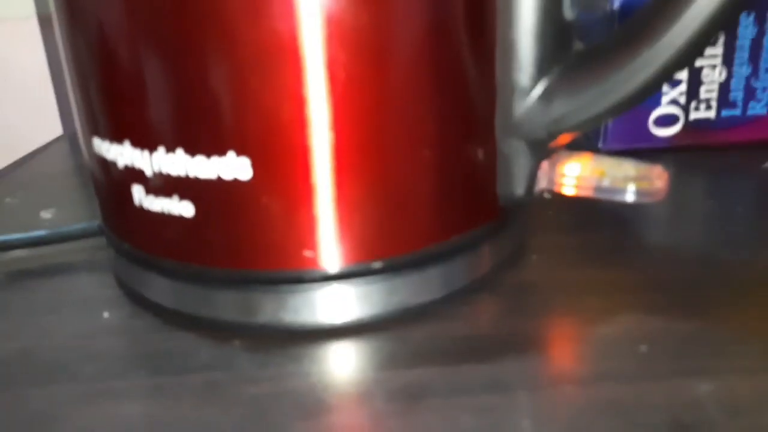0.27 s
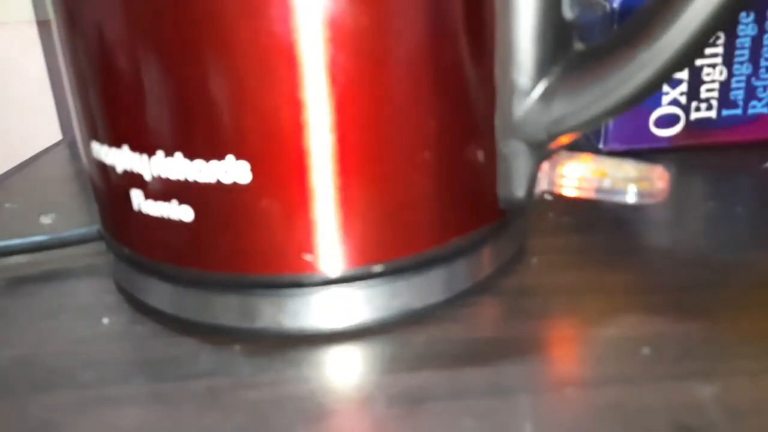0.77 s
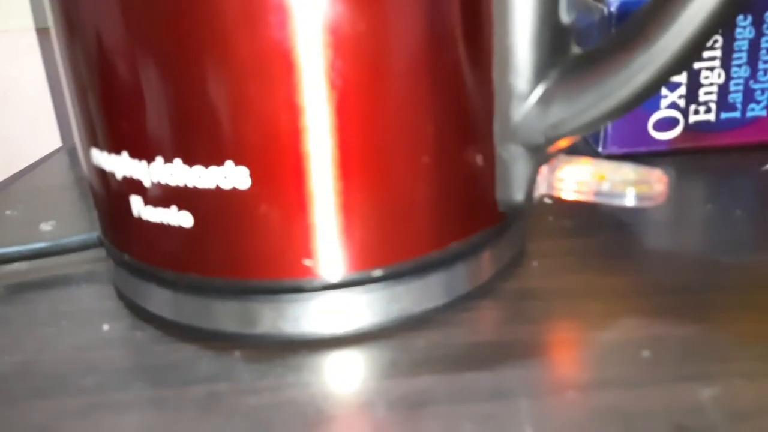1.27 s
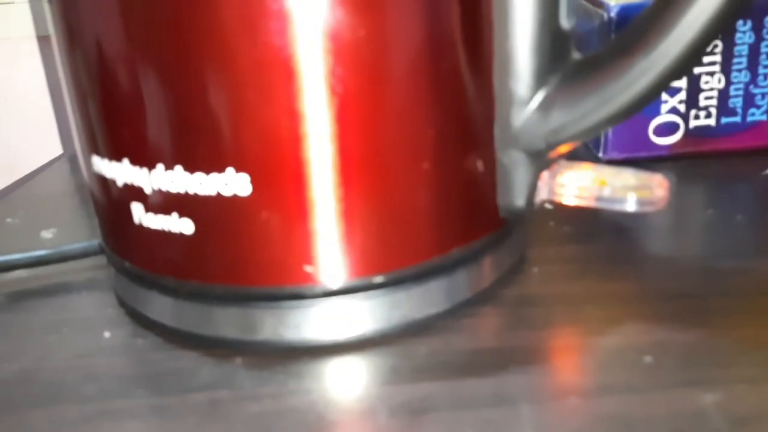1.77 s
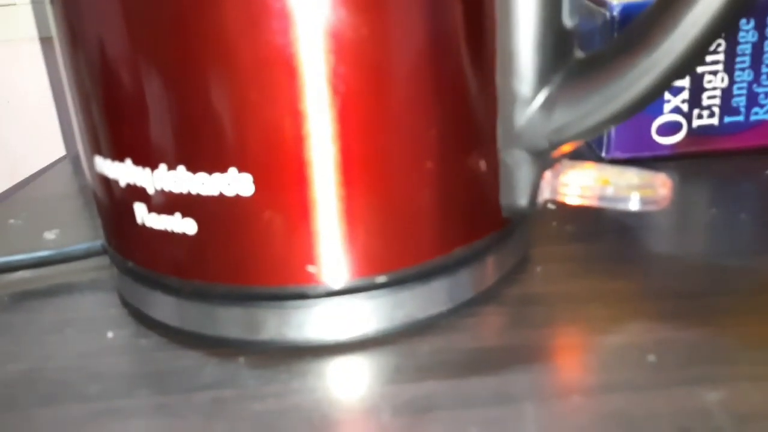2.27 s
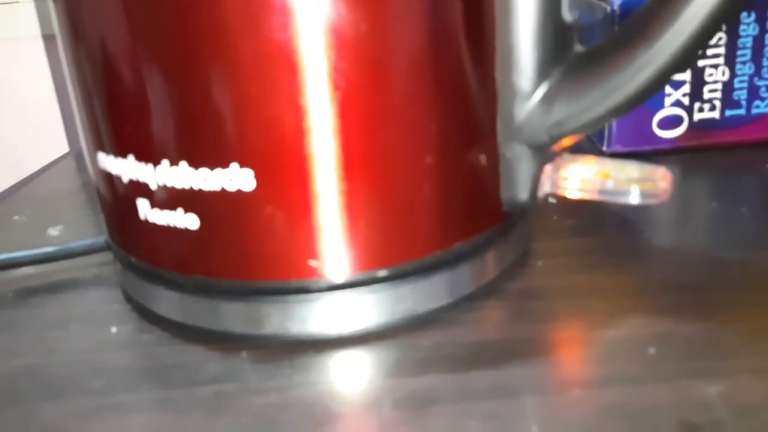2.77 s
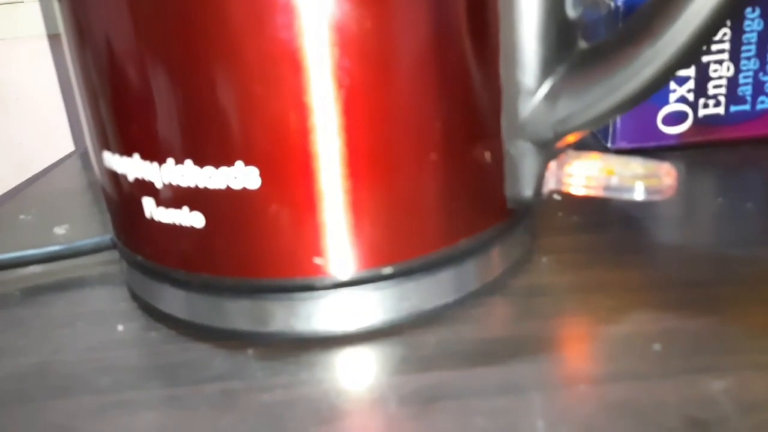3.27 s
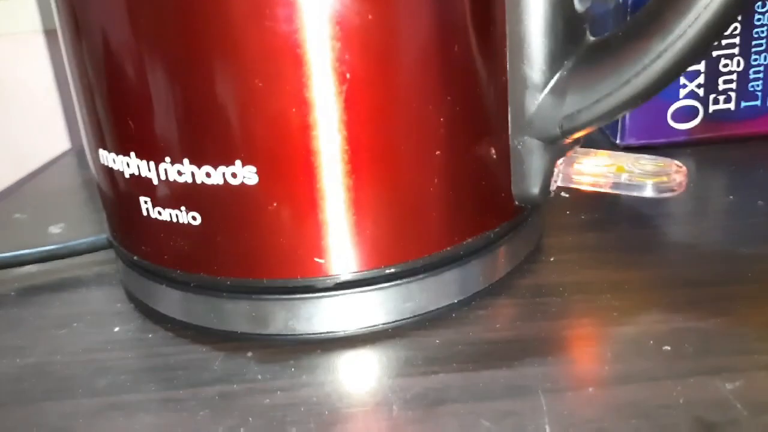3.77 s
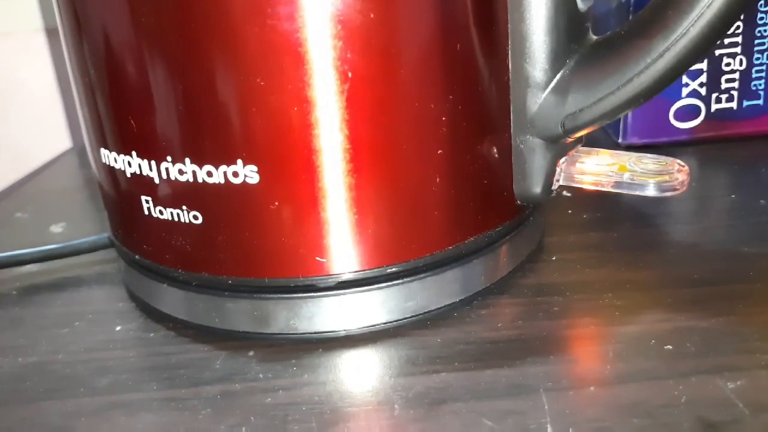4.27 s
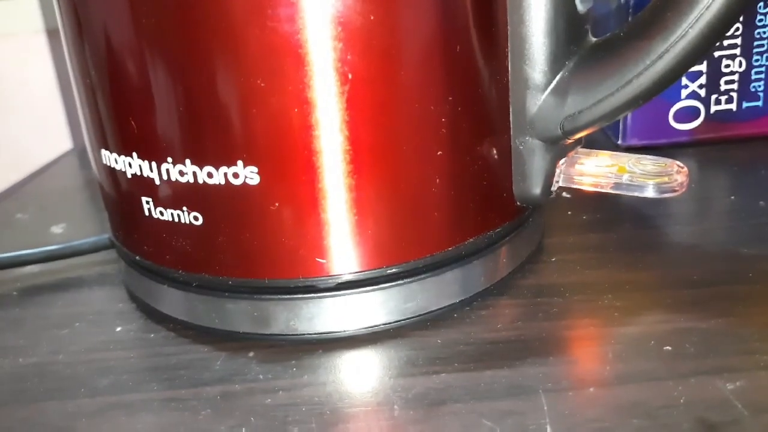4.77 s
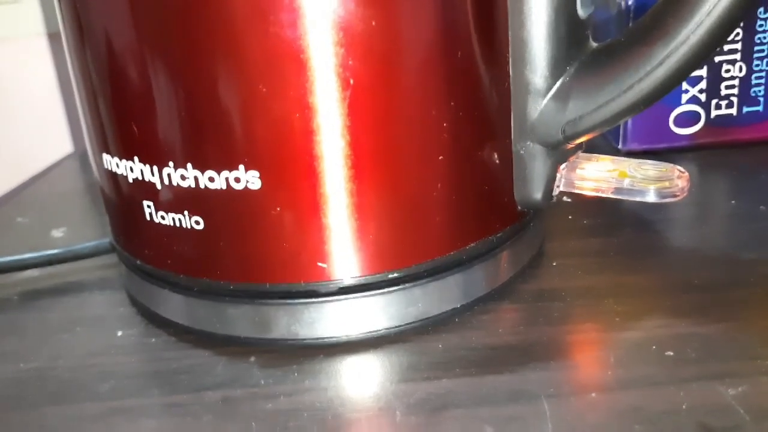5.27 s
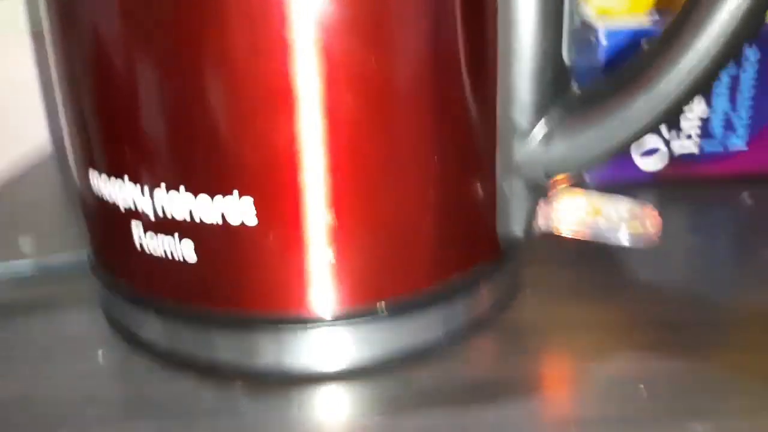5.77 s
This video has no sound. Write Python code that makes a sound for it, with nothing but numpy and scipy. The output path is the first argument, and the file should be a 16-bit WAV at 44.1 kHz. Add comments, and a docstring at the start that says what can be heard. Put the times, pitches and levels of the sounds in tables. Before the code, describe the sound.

Close up, an electric kettle heats: a low hollow rumble with soft hiss swells for over a second, then holds steady with bubbly knocks.

```python
"""Electric kettle heating up

Heard close by on a kitchen counter, through a hand-held microphone.
Steam bubbles grow on the hot plate and collapse in cooler water: large ones rumble, countless small
ones hiss, as random impulses through the resonances of the hollow body. The rush swells for over a
second, then roughly holds. Crackle, plinks and the short low lumps that stand out of the rumble are
decaying sines. Faint ticks, low bumps and a little room reverberation complete it."""
import sys
import numpy as np
from scipy import signal
from scipy.fft import rfft, irfft
from scipy.io import wavfile

SR = 44100
rng = np.random.default_rng(int(sys.argv[2]) if len(sys.argv) > 2 else 0)


def master(y):
    """Save y as 16-bit WAV."""
    cut = np.clip(np.atleast_2d(y).T, -1, 1)
    pcm = np.round(cut * 32767)  # scale
    wavfile.write(sys.argv[1], SR, pcm.astype(np.int16))


N = 264996
EDGE_HZ = 15720
TAPS = 8192  # length in samples of a collapse or a decaying sine

# kitchen decay time: (frequency [Hz], t60 [s])
KITCHEN_T60 = [(150, 0.23), (1000, 0.94), (5000, 0.15), (14000, 0.63)]
# soft low bumps, as from the hand that holds the microphone: (time [s], peak [dB], frequency [Hz])
HAND_BUMPS = [(2.19, -45, 54), (5.60, -44, 58), (5.99, -38.5, 54.5)]
# faint dry ticks: (time [s], peak [dB])
DRY_TICKS = [(5.540, -50), (5.837, -46)]
# free bubbles that ring briefly: (time [s], peak [dB], frequency [Hz])
PLINK_BUBBLES = [(0.923, -63, 6550), (1.296, -42, 2810), (1.349, -44, 2320), (1.421, -42, 2060),
                 (1.471, -34, 1140), (2.050, -44, 2240), (2.108, -35, 990), (2.364, -43, 2830),
                 (2.952, -59, 6720), (5.807, -47, 2820)]
# short low knocks and lumps within the rumble: (time [s], peak [dB], frequency [Hz], swell [s])
RUMBLE_LUMPS = [(0.088, -40, 805, 0.0034), (0.258, -34.5, 494, .012), (0.506, -37.5, 517, 0.0068),
                (0.535, -35, 237, 0.015), (0.674, -28, 260, 0.0052), (1.243, -25.5, 262, 0.0067),
                (1.520, -23.5, 231, 0.021), (1.646, -26.5, 516, .004), (2.312, -25, 473, 0.0041),
                (2.727, -31.5, 475, .005), (4.634, -22.5, 488, 0.006), (5.054, -22, 480, 0.0055),
                (5.765, -18, 410, 0.0014), (5.814, -28, 690, .003), (5.940, -33, 566, 0.0039)]
# resonances of steel body, water and air above: (frequency [Hz], width [Hz], lift [dB])
BODY_MODES = [(103, 6, 1.5), (131.3, 13.3, 5), (199.8, 8.9, 5.5), (230.6, 16.6, 9), (250.3, 27, 8.5),
              (277.5, 13.4, 6), (398.4, 32, 3.5), (451, 15.5, 3.5), (480.6, 44, 6), (505, 11.6, 5),
              (533.5, 36, 3.5), (603, 23, 2.5), (808, 54, 4.5), (951, 64, 3.5), (1179, 98, 6.5),
              (1270, 67, 2.5), (1906, 150, 3), (2660, 650, 1), (4450, 870, 3), (5850, 760, 4)]
# colour of large collapses: (frequency [Hz], relative density [dB per Hz])
LARGE_COLOUR = [(20, -45), (35, -28), (54, -15.5), (80, -12), (115, -6.5), (165, -2), (330, -0.5),
                (560, 0.5), (700, -5), (900, -8.5), (1040, -22), (1600, -31.5), (4000, -53.5)]
# colour of small collapses: (frequency [Hz], relative density [dB per Hz])
SMALL_COLOUR = [(200, -33), (700, -1), (1100, 1), (1550, 0.34), (2300, -6.2), (3600, -12), (5200, -17.5),
                (6500, -20.5), (7600, -23), (8800, -31), (10000, -28.5), (11900, -28), (13000, -33),
                (14700, -37.5), (15700, -39)]
# large bubbles swell in steps until about 1.3 s as more of the plate bubbles, then waver irregularly
# by a decibel or so: (time [s], level [dB])
RUMBLE_LEVEL = [(0, -41), (0.45, -40), (0.56, -34), (0.68, -34.5), (1.0, -29), (1.3, -27), (1.46, -29),
                (1.59, -27), (1.75, -27), (2.42, -28), (2.66, -26.3), (3.62, -28), (3.8, -27.5),
                (4.17, -26), (4.4, -27), (5.25, -27.5), (5.77, -27), (6.0, -29)]
# small bubbles rise, pause, rise again, later soften slightly: (time [s], level [dB])
HISS_LEVEL = [(0, -56), (0.43, -55), (0.7, -48), (0.77, -49), (0.86, -47), (1.2, -44.5), (1.34, -43),
              (2.0, -43), (2.65, -42.5), (6.0, -43.5)]


def gain_of(db):
    """Decibels to amplitude."""
    return 10 ** (np.asarray(db) / 20)


def evened(x):
    """Scales to rms 1."""
    return x / np.sqrt(np.mean(x ** 2) + 1e-20)


def read(points, hz):
    """Interpolates a table on a log-frequency axis."""
    f, value = np.transpose(points)
    return np.interp(np.log(hz + 1), np.log(f + 1), value)


def level(curve):
    """Amplitude at every sample, from (time [s], level [dB])."""
    return gain_of(np.interp(np.arange(N) / SR, *np.transpose(curve)))


def add(mix, start_s, sound):
    """Mixes a sound in at its start time."""
    part = mix[max(round(start_s * SR), 0):][:len(sound)]
    part += sound[:len(part)]


def drift(low_hz, high_hz):
    """Slow random fluctuation, rms 1: noise cut below low_hz, rolled off around high_hz."""
    hz = np.fft.rfftfreq(N, 1 / SR)
    band = (hz > low_hz) / (1 + (hz / high_hz) ** 2)
    return evened(irfft(rfft(rng.standard_normal(N)) * band, N))


def kitchen(x):
    """Dense reflections off hard walls: noise whose decay time depends on frequency."""
    hz, t, noise = signal.stft(rng.standard_normal(SR // 2), SR, nperseg=256)
    decay_db = -60 * t / read(KITCHEN_T60, hz)[:, None]
    tail = signal.istft(noise * gain_of(decay_db), SR, nperseg=256)[1]
    tail = np.r_[np.zeros(SR // 200), tail]  # 5 ms before the reflections
    return signal.fftconvolve(x, tail / np.linalg.norm(tail))[:N]


def bumps(width_s=0.036):
    """The hand shifts: a few soft, very low cycles under a Gaussian envelope."""
    t = np.arange(N) / SR
    out = np.zeros(N)
    for s, db, hz in HAND_BUMPS:
        envelope = gain_of(db) * np.exp(-((t - s) / width_s) ** 2)
        out += envelope * np.sin(2 * np.pi * hz * (t - s))
    return out


def decaying_sine(db, hz, rise_s):
    """Swells, rings at one pitch and dies away, as a single bubble does."""
    t = np.arange(TAPS) / SR
    envelope = t / rise_s * np.exp(1 - t / rise_s)  # peaks at 1
    return gain_of(db) * envelope * np.sin(2 * np.pi * hz * t)


def ticks(hz=13200, rise_s=0.00013):
    """Tiny bright ticks: decaying sines with almost no ring."""
    out = np.zeros(N)
    for s, db in DRY_TICKS:
        add(out, s, decaying_sine(db, hz, rise_s))
    return out


def plinks(rise_s=0.0025):
    """Small freed bubbles ring for some milliseconds."""
    out = np.zeros(N)
    for s, db, hz in PLINK_BUBBLES:
        add(out, s, decaying_sine(db, hz, rise_s))
    return out


def rumble_lumps():
    """Short low knocks and lumps that stand out of the random rumble, each with its own swell."""
    out = np.zeros(N)
    for s, db, hz, swell_s in RUMBLE_LUMPS:
        add(out, s, decaying_sine(db, hz, swell_s))
    return out


def crackle(per_s=150, db=-2.0, spread_db=2.5, low_hz=1200, high_hz=3200, octave_db=-6, rise_s=0.00085):
    """Middle-sized bubbles pop at random, higher ones more faintly; levels relative to the hiss."""
    out = np.zeros(N)
    for when, pitch, size in rng.random((round(per_s * N / SR), 3)):
        octaves = pitch * np.log2(high_hz / low_hz)
        size_db = spread_db * min(-np.log(1 - size), 3)
        pop_db = db + octave_db * octaves + size_db
        add(out, when * N / SR, decaying_sine(pop_db, low_hz * 2 ** octaves, rise_s))
    return out


def collapse(colour):
    """One bubble collapse as the kettle radiates it: a sharp start, then the body rings."""
    hz = np.fft.rfftfreq(TAPS, 1 / SR)
    db = read(colour, hz)
    for f, width_hz, lift_db in BODY_MODES:
        db = db + lift_db / (1 + (2 * (hz - f) / width_hz) ** 2)
    log_gain = np.log(gain_of(np.r_[db, db[-2:0:-1]]))
    # minimum phase puts the energy first
    return np.fft.ifft(np.exp(np.conj(signal.hilbert(log_gain)))).real


def swarm(colour, per_s, spread_db, clump_db, clump_hz):
    """Collapses of uneven size at random moments, in louder and softer clumps; rms 1."""
    size_db = spread_db * np.minimum(rng.exponential(1, N), 4)
    size = gain_of(size_db + clump_db * drift(1.1, clump_hz))
    kicks = size * rng.choice([-1, 1], N) * (rng.random(N) < per_s / SR)
    # circular convolution: the body already rings at the start
    return evened(irfft(rfft(kicks) * rfft(collapse(colour), N), N))


def steadied(x, span_s):
    """Holds power steady over the span, so that only fast flutter stays."""
    span = np.hanning(round(2 * span_s * SR))
    power = signal.fftconvolve(x ** 2, span, "same") / signal.fftconvolve(np.ones(N), span, "same")
    return x / np.sqrt(power)


def sloshed(x, bend, slosh_hz):
    """Moving water bends the resonances a little up and down; bend is the rms speed ratio."""
    n = np.arange(N)
    shift = np.cumsum(bend * drift(0.99, slosh_hz))  # in samples
    return np.interp(n + shift, n, x, period=N)


def kettle():
    """Large bubbles rumble, small ones hiss, through the same body, each at its own level."""
    rumble = swarm(LARGE_COLOUR, per_s=2200, spread_db=1.5, clump_db=0.5, clump_hz=27.6)
    rumble = steadied(rumble, span_s=0.18)
    rumble = sloshed(rumble, bend=0.002, slosh_hz=3.6)
    hiss = swarm(SMALL_COLOUR, per_s=22000, spread_db=1.5, clump_db=0.44, clump_hz=30)
    return level(RUMBLE_LEVEL) * rumble + level(HISS_LEVEL) * (hiss + crackle())


def scene():
    """The kettle close by, with a little of the room."""
    near = kettle() + plinks() + rumble_lumps() + ticks()
    room_db = -13
    # the hand sways, so the pattern of reflections keeps changing
    sway = np.pi * np.arange(N) / SR
    room = kitchen(near * np.cos(sway)) + kitchen(near * np.sin(sway))
    return (near + gain_of(room_db) * room + bumps())[None]


def record(dry):
    """The recorder's band limit: a steep low-pass."""
    low_pass = signal.firwin(1023, EDGE_HZ, window=("kaiser", 9), fs=SR)
    return signal.oaconvolve(dry, low_pass[None], "same")


dry = scene()
out = record(dry)
master(out)
```